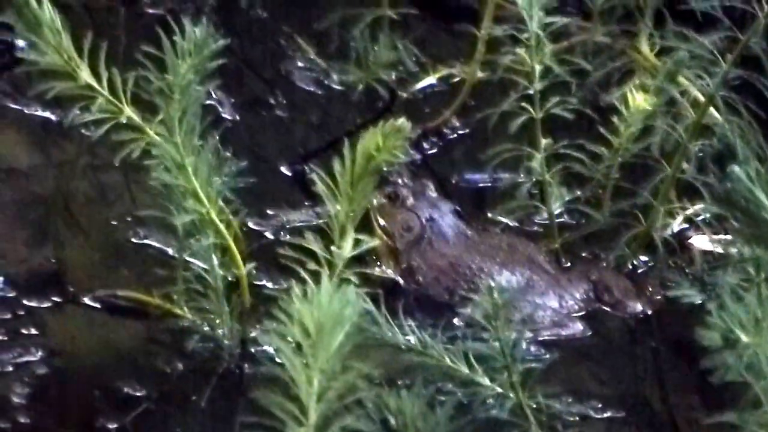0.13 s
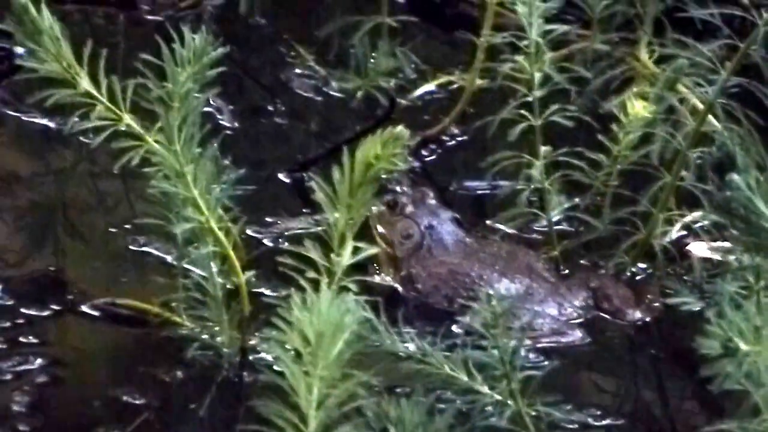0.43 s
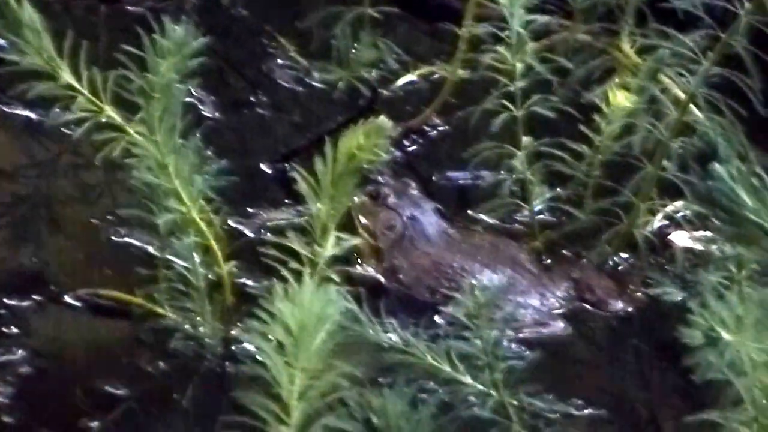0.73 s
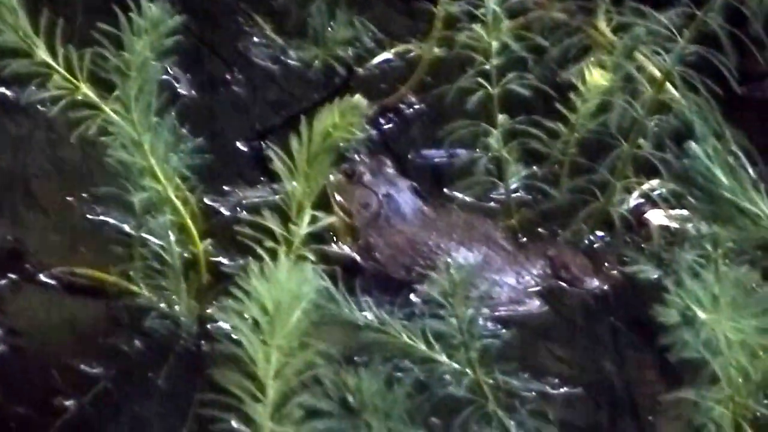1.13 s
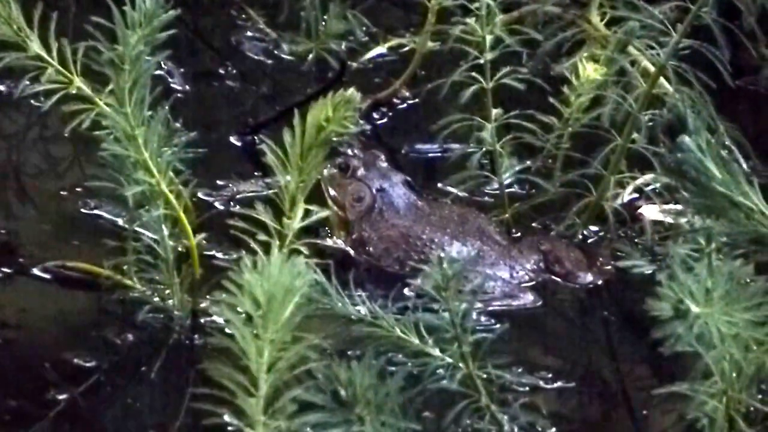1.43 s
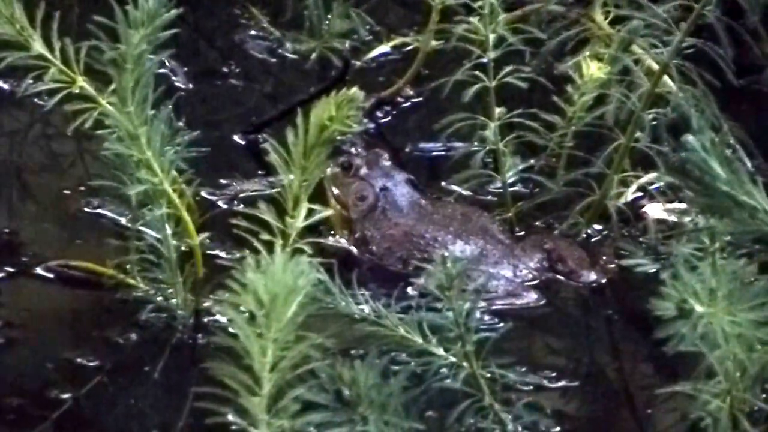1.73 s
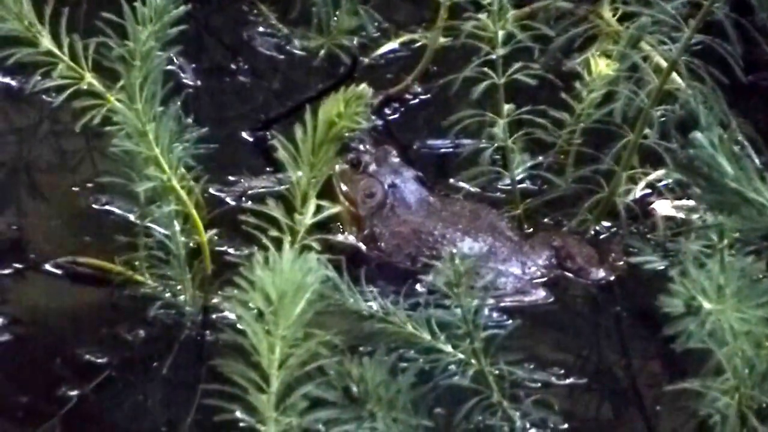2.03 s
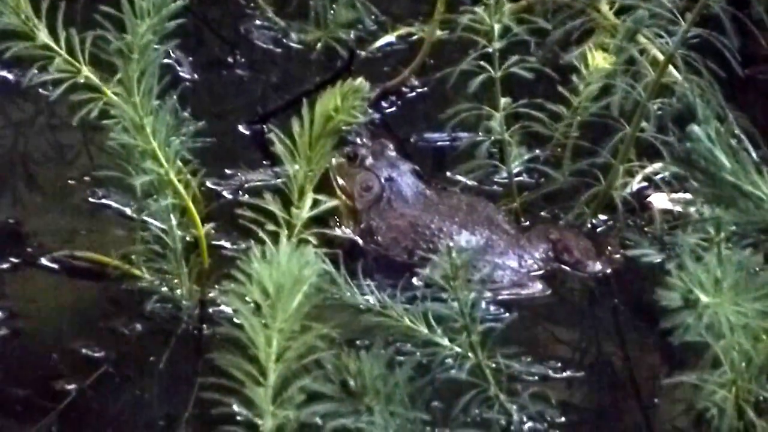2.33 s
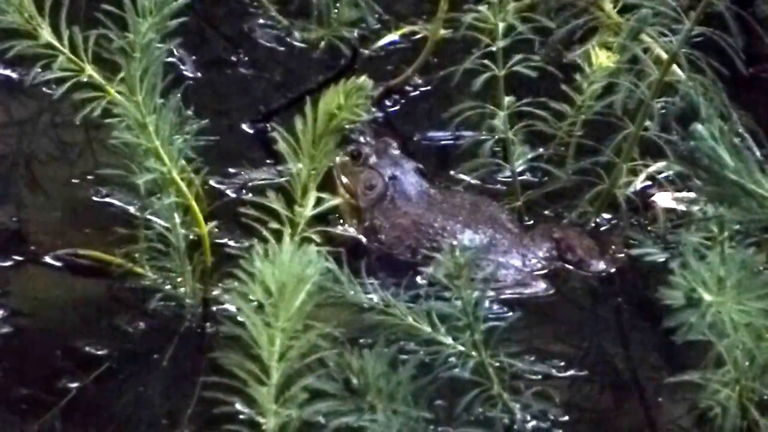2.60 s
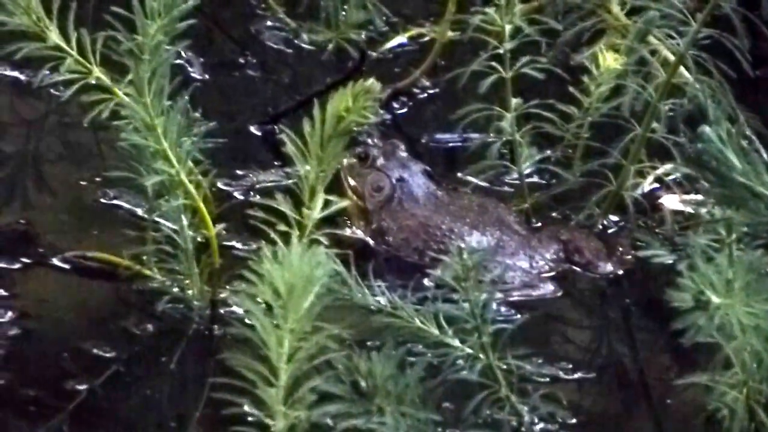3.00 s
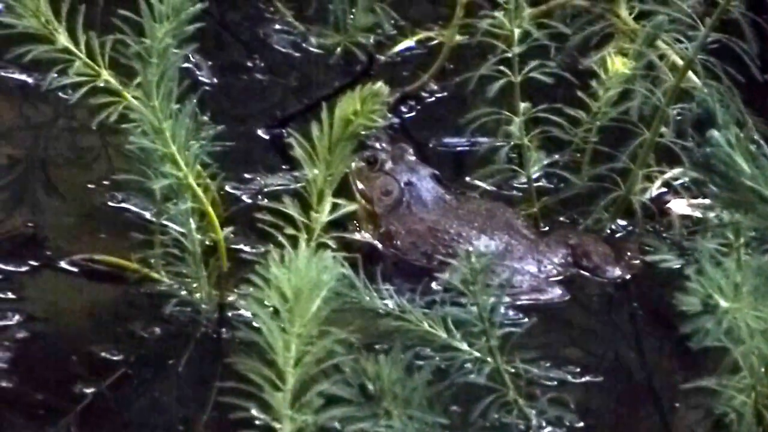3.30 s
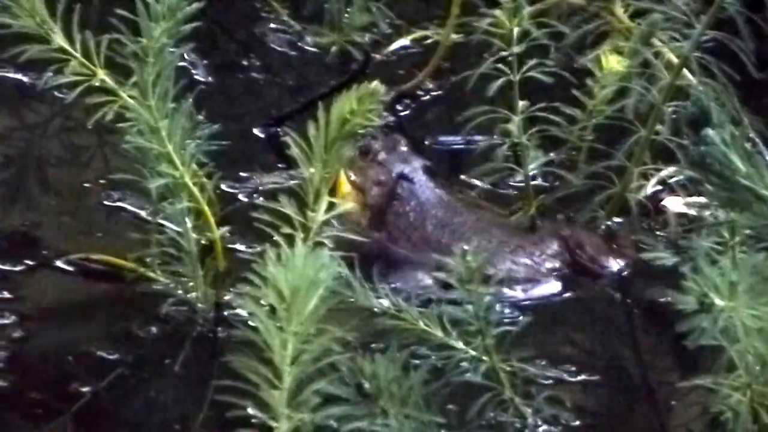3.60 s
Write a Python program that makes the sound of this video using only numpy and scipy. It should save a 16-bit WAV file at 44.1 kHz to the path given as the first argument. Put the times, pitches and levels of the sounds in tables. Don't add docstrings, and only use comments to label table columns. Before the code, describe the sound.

A bullfrog bellows low twice over a loud, continuous hissing chorus of insects at a pond

```python
import sys
import numpy as np
from scipy import signal
from scipy.fft import rfft, irfft, next_fast_len
from scipy.io import wavfile
from scipy.ndimage import uniform_filter1d, map_coordinates

SR = 44100
rng = np.random.default_rng(int(sys.argv[2]) if len(sys.argv) > 2 else 0)


def voltage_ratio(level):
    return 10 ** (np.asarray(level, float) / 20)


def waveform_to_disk(signal):
    frames = np.transpose(np.atleast_2d(signal))
    scaled = np.clip(frames, -1, 1) * 32767
    samples = np.round(scaled).astype(np.int16)
    wavfile.write(sys.argv[1], SR, samples)


N = 165375
T = np.arange(N) / SR


def unit(x):
    return x / np.sqrt(np.mean(x ** 2) + 1e-20)


def along(points, hz):
    f, value = np.transpose(points)
    return np.interp(np.log(hz + 1), np.log(f + 1), value)


def curve(rows):
    s, *columns = np.transpose(rows)
    return [np.interp(T, s, column) for column in columns]


def wobble(rate):
    knots = rng.standard_normal(int(N * rate / SR) + 4)
    return map_coordinates(knots, [T * rate])


def noise():
    return rng.standard_normal((2, N))


def filtered(x, response):
    m = next_fast_len(N + 8192)
    return irfft(rfft(x, m) * response(np.fft.rfftfreq(m, 1 / SR)), m)[..., :N]


def ear_lag(hz, lag_s):
    return np.exp(np.outer([-1, 1], 1j * np.pi * hz * lag_s))


# hz, correlation
EAR_LIKENESS = [(60, 0.93), (150, 0.99), (300, 1), (640, 0.66), (1400, 0.53), (3100, 0.056), (8000, 0.38),
                (10500, -0.26), (12300, -0.46), (15000, -.2)]
# hz, left_over_right_db
FIELD_BALANCE = [(60, -3), (180, -2.5), (550, -1.5), (1650, 0), (4970, -0.5), (15000, 1.5)]


def diffuse(pair, spectrum, patchy_db):
    z = signal.stft(pair, nperseg=512)[2]
    patches = uniform_filter1d(rng.standard_normal(z.shape[1:]), size=5, axis=0)
    patches = uniform_filter1d(patches, size=12, axis=1)
    pair = signal.istft(z * voltage_ratio(patchy_db * unit(patches)), nperseg=512)[1][:, :N]

    def mid_side(hz):
        angle = np.arccos(np.clip(along(EAR_LIKENESS, hz), -1, 1)) / 2
        return voltage_ratio(along(spectrum, hz)) * [np.cos(angle), np.sin(angle)]

    def balance(hz):
        return voltage_ratio(np.outer([.5, -.5], along(FIELD_BALANCE, hz))) * ear_lag(hz, 1e-5)

    mid, side = filtered(pair, mid_side)
    wide = filtered(np.array([mid + side, mid - side]), balance)
    return wide / np.std(wide.mean(0))


def echoed(x, t60, wet_db, alike):
    t = np.arange(SR // 2) / SR
    common, split = rng.standard_normal((2, len(t))) * voltage_ratio(-60 * t / t60) * (t > .004)
    split = split - uniform_filter1d(split, size=80)
    tail = np.array([common + (1 - alike) * split, common - (1 - alike) * split])
    tail = tail / np.linalg.norm(tail[0])
    return x + voltage_ratio(wet_db) * signal.fftconvolve(x[None], tail, axes=1)[:, :N]


# hz, level_db per Hz
AIR_COLOUR = [(240, -59), (400, -1), (439, -8), (722, -6), (1250, -10), (1950, -13), (2540, -43),
              (4290, -120)]
# start_s (centre), length_s, level_db over the air
GRUNTS = [
    (.37, 0.028, 4),
    (2.706, 0.078, 5),
]


def quiet_air():
    grunts_db = sum(db * np.exp(-((T - s) / length) ** 2) for s, length, db in GRUNTS)
    return voltage_ratio(-56.5 + grunts_db) * diffuse(noise(), AIR_COLOUR, patchy_db=1.4)


# start_s, level_db
MURMUR = [
    (0, -47.5),
    (1.3, -46),
    (2, -46.5),
    (2.6, -46),
    (3.2, -43),
    (3.75, -46),
]
# hz, level_db per Hz
MURMUR_COLOUR = [(15, -50), (28, -26), (42, -6), (64, -6), (146, -3), (172, -0.5), (210, 2), (279, -10),
                 (344, -2), (480, -39), (620, -53), (1060, -120)]


def far_bullfrog_murmur():
    level_db = curve(MURMUR)[0] + 0.54 * wobble(4.64)
    return voltage_ratio(level_db) * diffuse(noise(), MURMUR_COLOUR, patchy_db=0)


# pitch_hz, level_db
FAR_CRICKETS = [(2480, -76), (2702, -62), (2822, -64.5), (3085, -63.5)]


def far_crickets():
    blur_hz = 25.07

    def ear(hz):
        phase = 2 * np.pi * hz * T
        return wobble(blur_hz) * np.cos(phase) + wobble(blur_hz) * np.sin(phase)

    return sum(voltage_ratio(db) * np.array([ear(hz), ear(hz)]) * 1.39 for hz, db in FAR_CRICKETS)


# start_s, level_db
CICADAS = [
    (0.0, -18.5),
    (3.5, -17.5),
    (3.75, -19),
]
# hz, level_db per Hz
TYMBAL = [(2760, -54), (4700, -23), (4860, -22.5), (5200, -26.5), (5800, -11), (7010, -6), (8310, 0.5),
          (8810, -2), (11200, -24), (14600, -40), (22000, -120)]
# hz, level_db per Hz
FIZZ_COLOUR = [(6180, -37), (10500, -13), (11300, -3.5), (12600, -0.5), (14600, -5.5), (15500, -5)]
# hz, level_db per Hz
GAP_COLOUR = [(2250, -29), (2420, -6), (2550, -6), (2800, -3), (3300, -3.5), (3520, -18), (3700, -12),
              (5200, 11), (5600, -30)]


def cicadas():
    clicks_per_s, click_spread_db = 6000, 0.5
    struck = rng.random((2, N)) < clicks_per_s / SR
    clicks = struck * voltage_ratio(click_spread_db * noise()) * np.sign(noise())
    level_db = curve(CICADAS)[0] + 0.39 * wobble(5.93)
    hiss = voltage_ratio(level_db) * diffuse(unit(clicks) + 0.89 * noise(), TYMBAL, patchy_db=0.0)
    fizz = voltage_ratio(-37.5) * diffuse(noise(), FIZZ_COLOUR, patchy_db=1.5)
    gap_colour = [(900, -120)] + GAP_COLOUR + [(7000, -120)]
    gap = voltage_ratio(-49) * diffuse(noise(), gap_colour, patchy_db=-1.1)
    return hiss + fizz + gap


# hz, level_db per Hz
LOW_CHOIR = [(1150, -52), (1950, -3), (1980, -44), (2020, 4.5), (2140, 8.5), (2280, 1), (2420, -16.5),
             (3150, -78), (5320, -120)]
# hz, level_db per Hz
HIGH_CHOIR = [(3000, -90), (3560, -46), (3660, -21.5), (3820, -8.5), (4010, -4), (4200, 2), (4440, -0.5),
              (4750, -19), (6000, -90)]


def far_tree_frogs():
    low = voltage_ratio(-45) * diffuse(noise(), LOW_CHOIR, patchy_db=1.0)
    high = voltage_ratio(-36.5) * diffuse(noise(), HIGH_CHOIR, patchy_db=2.0)
    return low + high


# pitch_hz, level_db
WING = [(5605, -40), (5780, -46), (6020, -40), (6214, -47), (12550, -55)]


def cricket():
    chirp_hz, first_s, sharpness, fall = 14.93, .053, 3, .005
    cycle = 2 * np.pi * chirp_hz * (T - first_s)
    chirp = np.exp(sharpness * (np.cos(cycle) - 1))
    bent_time = np.cumsum(1 - fall * np.sin(cycle)) / SR
    song = 0
    for hz, db in WING:
        level_db = db + 0.46 * wobble(12) + wobble(0.44)
        song = song + voltage_ratio(level_db) * np.sin(2 * np.pi * hz * bent_time)
    return echoed(3 * song * chirp, t60=0.16, wet_db=-5, alike=0.23)


def tree_frog_voice(hz, under_db, waver):
    phase = 2 * np.pi * np.cumsum(hz * (1 + waver * wobble(120))) / SR
    return np.sqrt(2) * (np.sin(2 * phase) + voltage_ratio(under_db) * np.sin(phase))


# start_s, level_db (peak), pitch_hz (octave)
CROAKS = [(0.0194, -19.5, 4050), (0.0682, -22, 4170), (0.1775, -29, 4210), (0.2029, -23.5, 4140),
          (0.2433, -28, 4210), (0.3411, -31, 4180), (0.4055, -22.5, 4160), (0.4459, -27, 4170),
          (0.4994, -31, 4220), (0.5965, -24, 4140), (0.6155, -24.5, 4140), (0.6654, -24, 4170),
          (0.7577, -28, 4200), (0.8644, -28, 4100), (0.9058, -30, 4150), (1.1293, -24.5, 4260),
          (1.482, -37, 4160), (2.826, -21, 4270), (3.5294, -30, 4000), (.025, -27, 3850),
          (.175, -28.5, 3920), (.47, -31, 3880), (1.3, -34, 4030), (1.49, -36, 4030)]


def tree_frog_croaks():
    length_s, peak_s, below_db = 0.013, 0.0059, -7
    croaks = 0
    for s, db, octave_hz in CROAKS:
        envelope = np.exp(-((T - s - peak_s) / length_s) ** 2)
        voice = tree_frog_voice(octave_hz / 2, under_db=-12, waver=0.00794)
        croaks = croaks + voltage_ratio(db + below_db) * envelope * voice
    return echoed(croaks * voltage_ratio(2.5 * wobble(150)), t60=0.3, wet_db=-6, alike=0.083)


# start_s, length_s, pitch_hz (top), notes_per_s, level_db (octave)
TRILLS = [
    (.58, 2.32, 2170, 10.2, -30),
    (2.2, 1.6, 2328, 12, -36),
    (2.61, 1.29, 2230, 10.5, -30.5),
    (2.53, 1.9, 2190, 10.6, -32.5),
    (3.1, 1.2, 2205, 11, -32),
]


def tree_frog_trills():
    rise, rise_s, sag_per_s = .05, .13, .009
    depth_db, fade_db_per_s, swell_s = 7, 5, .45
    trills = 0
    for start, length, hz, rate, db in TRILLS:
        t = np.maximum(T - start, 0)
        pitch = hz * (1 - rise * np.exp(-t / rise_s) - sag_per_s * t)
        notes_db = depth_db * (np.cos(2 * np.pi * rate * t) - 1) / 2
        level_db = db + notes_db + wobble(7.77) - fade_db_per_s * t + 2.8 * wobble(70)
        swell = np.clip(np.minimum(t, length - t) / swell_s, 0, 1) ** 2
        voice = tree_frog_voice(pitch, under_db=-14.5, waver=0.001497)
        trills = trills + echoed(voice * swell * voltage_ratio(level_db), t60=0.17, wet_db=-1, alike=0.27)
    return trills


def bullfrog(call, body, tilt, late_ms, dips):
    pulse_hz, level_db, bright_db = curve(call)
    pulse_hz = uniform_filter1d(pulse_hz, size=1500)
    level_db = uniform_filter1d(level_db, size=900)
    effort_db = level_db - level_db.max()
    jitter, rasp_db, sac_low_hz = .007, -15, 153
    turns = np.cumsum(pulse_hz * (1 + jitter * wobble(90))) / SR
    voice = 0
    for k in range(1, 36):
        f = k * pulse_hz
        sac = 0
        for i, (centre, width, db) in enumerate(body):
            peak = 1j * f * width / (centre ** 2 - f ** 2 + 1j * f * width)
            delay = np.exp(-2j * np.pi * f * late_ms[i] / 1e3)
            sac = sac + (-1) ** i * voltage_ratio(db) * peak ** 2 * delay
        sac = sac / (1 + (sac_low_hz / f) ** 8)
        sac = sac * voltage_ratio(sum(db * np.exp(-((f - centre) / width) ** 2) for centre, width, db in dips))
        effort_loss_db = tilt * effort_db * np.maximum(f - 400, 0) / 1000
        gain = voltage_ratio(effort_loss_db + bright_db * np.clip((f - 500) / 800, 0, 1) + wobble(24.74))
        rasp = voltage_ratio(rasp_db) * min(k / 10, 1.4) * (wobble(90) + 1j * wobble(90))
        voice = voice + gain * np.real((1 + rasp) * sac * np.exp(2j * np.pi * k * turns))
    start, end = call[0][0], call[-1][0]
    loudness = np.std(voice[round(start * SR):round(end * SR)])
    edge = np.clip(np.minimum(T - start, end - T) / 0.006, 0, 1)
    return voice / loudness * voltage_ratio(level_db) * edge


# start_s, pulse_hz, level_db, brightness_db
CALL_A = [
    (.68, 88, -51, 7),
    (.73, 90.6, -42.5, 5),
    (.79, 89.6, -31, 4),
    (.86, 84.6, -27, 0.5),
    (.965, 85.65, -29.5, 1.5),
    (1.05, 88.6, -33.5, -1.5),
    (1.12, 90.7, -39.5, -1),
    (1.22, 90.7, -60, 0),
]
CALL_B = [
    (3.44, 97.9, -63, 0),
    (3.49, 97.6, -31, 2.5),
    (3.52, 100, -29.5, 4),
    (3.552, 104.3, -24.5, -0.5),
    (3.6, 103.7, -25.5, 3.5),
    (3.638, 101.1, -26.5, -8),
    (3.665, 99.7, -25, -0.5),
    (3.7, 98, -27, -3.5),
    (3.76, 97.3, -29, -8),
]
CALL_FAR = [
    (2.75, 93.9, -46.5, 0),
    (2.95, 91.8, -50, 0),
    (3.3, 90, -49.5, 0),
    (3.5, 87.9, -57, 0),
    (3.6, 88, -72, 0),
]
# centre_hz, width_hz, level_db
BODY_A = [(176, 39, -6), (276.5, 76, 2.5), (338, 104, -2.5), (646, 160, -14.5), (935, 127, -1.5),
          (1280, 250, -9), (1640, 240, -13.5), (2070, 340, -26), (2600, 800, -32)]
BODY_B = [(208, 57, 1), (297, 93, -7), (414, 77, -14.5), (795, 310, -16), (1024, 120, -12.5),
          (1320, 360, -18), (1670, 270, -20), (2230, 280, -22.5), (2800, 1800, -39)]
BODY_FAR = [(173, 57, -0.5), (352, 130, -10)]
EFFORT_TILT = [0.59, 0.25, .1]
LATE_A = [1.5, 1.5, 1.5, 2.73, 3.98, .34, 0, 0, 0]
LATE_B = [0, 0, 2, 5, 4.5, 0, 1, 1, 0.5]
# centre_hz, width_hz, level_db
DIPS = [
    [(510, 51, -1)],
    [(510, 54, -6), (930, 50, -3), (1135, 60, -1)],
    [(515, 60, -5)],
]


def bullfrogs():
    calls, bodies = (CALL_A, CALL_B, CALL_FAR), (BODY_A, BODY_B, BODY_FAR)
    voices = sum(map(bullfrog, calls, bodies, EFFORT_TILT, (LATE_A, LATE_B, LATE_B), DIPS))
    pan_db = np.array([[-1.5], [1.5]])
    pond = echoed(voices, t60=.18, wet_db=-13, alike=0.42)
    return filtered(pond, lambda hz: voltage_ratio(pan_db) * ear_lag(hz, 3e-5))


def scene():
    background = quiet_air() + far_bullfrog_murmur() + far_crickets() + cicadas() + far_tree_frogs()
    return background + cricket() + tree_frog_croaks() + tree_frog_trills() + bullfrogs()


def low_pass(x):
    return signal.sosfilt(signal.butter(12, 15620, fs=SR, output="sos"), x)


def record(dry):
    return low_pass(dry)


dry = scene()
out = record(dry)
waveform_to_disk(out)
```